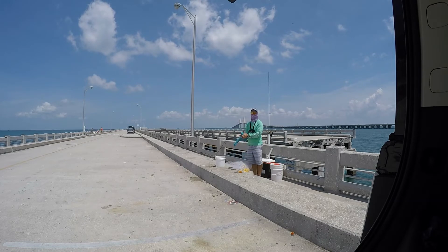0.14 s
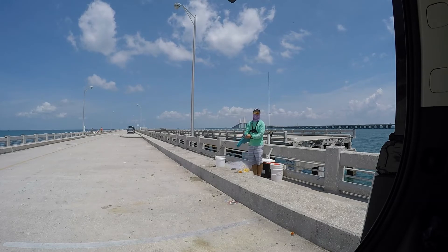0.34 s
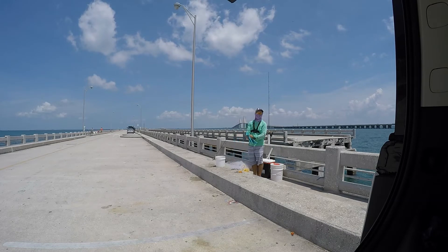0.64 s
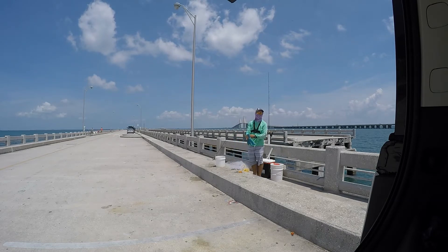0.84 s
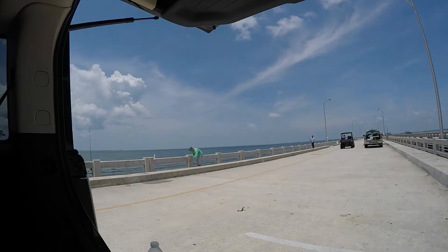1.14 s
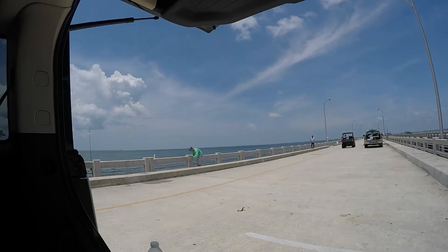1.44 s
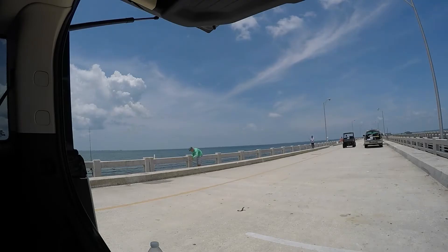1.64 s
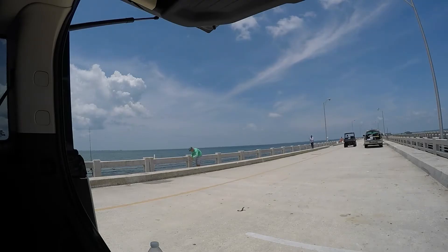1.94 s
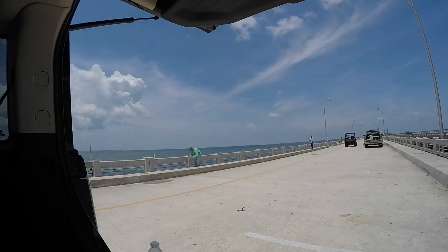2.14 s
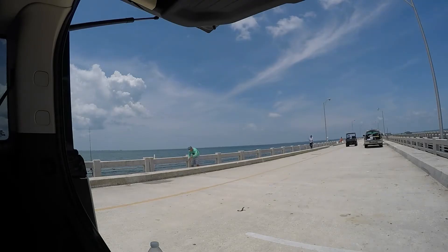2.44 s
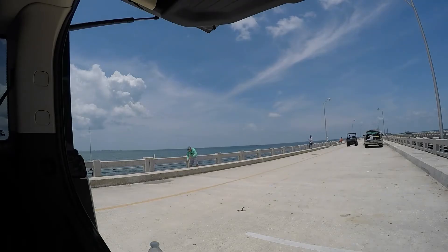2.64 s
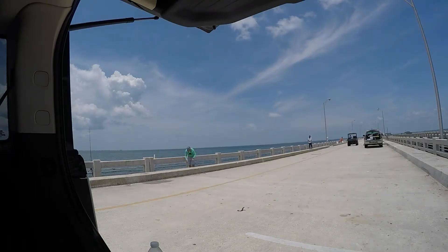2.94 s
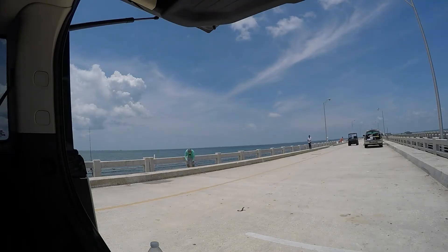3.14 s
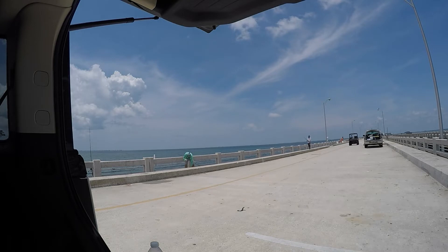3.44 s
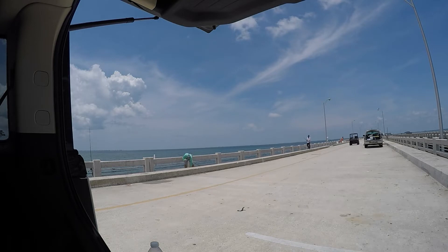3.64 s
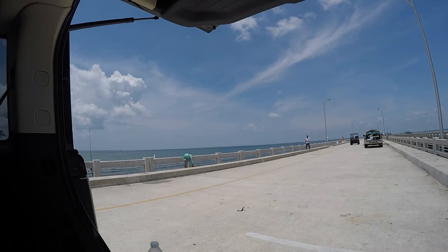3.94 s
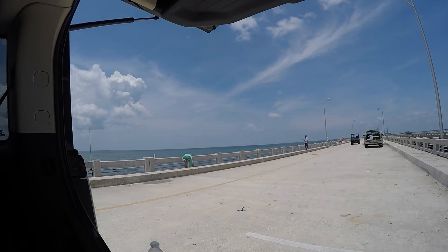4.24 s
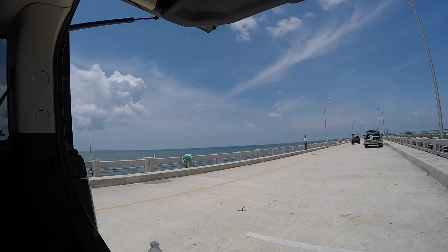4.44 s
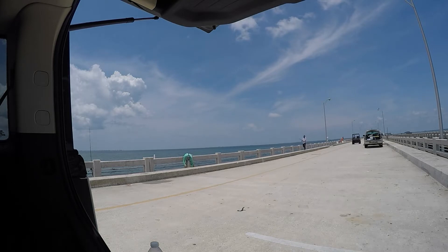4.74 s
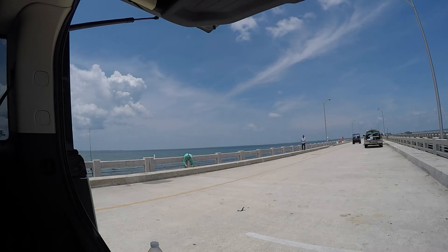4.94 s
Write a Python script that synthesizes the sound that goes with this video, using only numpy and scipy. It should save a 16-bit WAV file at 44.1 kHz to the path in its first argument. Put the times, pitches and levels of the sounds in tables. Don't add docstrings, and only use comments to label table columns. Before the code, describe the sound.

Low sea wind rumbles over faint surf hiss, then cuts to a vehicle engine idling close by with a steady droning throb.

```python
import sys
import numpy as np
from scipy import signal
from scipy.fft import rfft, irfft
from scipy.io import wavfile
from scipy.ndimage import uniform_filter1d

SR = 44100
rng = np.random.default_rng(int(sys.argv[2]) if len(sys.argv) > 2 else 0)


def digitize_waveform(pressure):
    field = np.atleast_2d(pressure).T
    bounded = np.clip(field, -1, 1)
    quanta = np.round(bounded * 32767).astype(np.int16)
    wavfile.write(sys.argv[1], SR, quanta)


def level_to_linear(level):
    exponent = np.asarray(level, float) / 20
    return 10 ** exponent


N = 224468
T = np.arange(N) / SR
HZ = np.maximum(np.fft.rfftfreq(N, 1 / SR), 1)

# (out from [s], out to [s], in from [s], in to [s])
FADE_TIMES = (1.095, 1.126, 1.1455, 1.18)
# (frequency [Hz], left minus right [dB])
PORT_BALANCE = [(60, -1.5), (400, -1.2), (800, 0.45), (1300, 0.2), (2300, -2), (4300, -3.5), (7900, -6.5),
                (14500, -2)]
# (frequency [Hz], share heard by both [0-1])
PORT_COHERENCE = [(50, 0.92), (300, .99), (700, 0.94), (1500, 0.74), (3000, 0.6), (6000, 0.29),
                  (14000, 0.18)]
PORT_LAG_S = 5.45 / 44100

# (frequency [Hz], density [dB per Hz])
PIER_SPECTRUM = [(8.8, -32), (15, -10.5), (57, -8.5), (135, -23.5), (214, -26), (255, -34), (303, -27),
                 (393, -32.5), (467, -32.5), (606, -32), (808, -31.5), (1280, -32), (1400, -33.5),
                 (2970, -44.5), (15000, -71)]
# (time [s], length [s], level [dB])
WIND_SWELLS = [
    (.15, 0.033, -2.5),
    (.33, 0.034, -1.5),
    (.42, .04, -0.5),
    (.57, 0.026, -3),
]
WIND_DB, SEA_DB, PREAMP_DB = -39.5, -54, -70

# (frequency [Hz], density [dB per Hz])
BOOM_SPECTRUM = [(15, -11), (47, 10.5), (74, -3.5), (108, 5.5), (140, -11), (200, -12), (400, -17),
                 (700, -57)]
# (time [s], length [s], level [dB])
PANEL_BURSTS = [
    (2.33, 0.11, 17.5),
    (2.7, 0.21, 13.5),
    (3.95, 0.14, 13),
    (4.28, 0.21, 16),
]
PANEL_HZ, PANEL_WIDTH_HZ, PANEL_DB = 572.4, 5.7, -63.5

# (frequency [Hz], density [dB per Hz])
GAS_SPECTRUM = [(300, -1.5), (450, -4.5), (600, -9.5), (780, -12), (1100, -10.5), (1700, -7), (2150, -6),
                (2450, -14), (3300, -14), (4000, -16.5), (8500, -21.5), (10500, -28), (13000, -32.5),
                (15000, -40)]
# (time [s], length [s], level [dB])
GAS_SURGES = [
    (2.22, .1, 1.5),
    (2.44, .08, -1.2),
    (2.62, 0.15, 1.2),
    (4.72, .2, 1.5),
]
# (frequency [Hz], width [Hz], level [dB])
BLOCK_MODES = [(565, 97, -4), (652, 53, -3), (1040, 440, -7.5), (1380, 35, 0.5), (1553, 390, -7.5),
               (1656, 55, -.5), (1733, 78, -8.5), (2040, 55, 0.5), (2764, 96, -13), (2980, 50, -11.5),
               (3243, 48, -7.5), (3485, 570, -18.5), (4403, 83, -13), (4755, 35, -12.5), (5240, 110, -15.5),
               (6900, 36, -17.5)]
# (time [s], length [s], level [dB])
BLOCK_RATTLES = [
    (1.7, 0.12, 1),
    (2.24, .15, -5),
    (3.97, .08, 2),
    (4.5, 0.17, -2),
    (5.0, 0.038, 1),
]
# (multiple of firing rate, level re clatter [dB], gain under load [dB])
GEAR_TEETH = [(50, -13, 2), (51, -17, 26), (54, -15, 5), (57, -15, 3), (68, -23, 6)]
WHINE_FLUTTER_DB, WHINE_WOBBLE_RAD = 2.8, 0.6

# (multiple of firing rate, level [dB])
LOADED_HARMONICS = [(1, -4), (2, -4), (3, -4), (4, -2), (5, 1), (6, -15.5), (7, -1), (8, -5.5), (9, -12.5),
                    (10, -23), (11, -12), (12, -7.5), (13, -19), (14, -41), (15, -58), (16, -25),
                    (17, -18.5), (18, -34), (19, -30.5), (20, -28)]
# (multiple of firing rate, level [dB])
LIGHT_HARMONICS = [(1, -0.5), (2, 1.5), (3, 2), (4, -6), (5, 0), (6, -12.5), (7, -21), (8, -16), (9, -47),
                   (10, -18), (11, -15), (12, -12), (13, -16), (14, -32), (15, -35), (16, -40), (17, -16),
                   (18, -49), (19, -19), (20, -17)]
# (time [s], firing rate [Hz])
FIRING_RATE = [(1.17, 30.648), (1.45, 30.744), (1.7, 30.73), (1.95, 30.771), (2.25, 31.102), (2.55, 31.268),
               (2.8, 31.637), (3.05, 31.09), (3.35, 30.788), (3.65, 30.473), (3.95, 30.302), (4.15, 30.292),
               (4.45, 30.397), (4.75, 30.484), (5.09, 30.342)]
# (time [s], load [0-1], effort re full [dB])
ENGINE_LOAD = [
    (1.17, 0.69, 0),
    (1.7, 0.76, 0),
    (2.3, 0.75, -0.7),
    (2.7, 0.55, -1.3),
    (3.05, 0.59, -3),
    (3.4, 0.46, -5),
    (3.65, 0.49, -5),
    (4.0, 0.12, -5.5),
    (5.09, 0.05, -6),
]
TWIST_RAD, EVEN_LOAD = 1.4, 0.6
EXHAUST_DB, CLATTER_DB, GAS_DB, BOOM_DB = -30.5, -42.5, -42, -43
CLATTER_SHARE, GAS_SHARE = 0.42, 0.69


def unit(x):
    return x / np.sqrt(np.mean(x ** 2))


def over_hz(table):
    hz, value = np.transpose(table)
    return np.interp(np.log(HZ), np.log(hz), value)


def curves(table):
    s, *columns = np.transpose(table)
    return [np.interp(T, s, column) for column in columns]


def walk(rate):
    hold = int(SR / rate)
    levels = np.repeat(rng.standard_normal(N // hold + 1), hold)
    slewed = uniform_filter1d(uniform_filter1d(levels, hold), hold)
    return 1.48 * slewed[:N]


def swells(table):
    return sum(db * np.exp(-((T - s) / length) ** 2) for s, length, db in table)


def ports(gain, envelope):
    shared, left, right = rfft(rng.standard_normal((3, N)) * envelope)
    coherence = np.clip(over_hz(PORT_COHERENCE), 0, 1)
    late = np.exp(-2j * np.pi * HZ * PORT_LAG_S)
    direct = np.sqrt(coherence) * shared * np.array([late, late ** 0])
    diffuse = np.sqrt(1 - coherence) * np.array([left, right])
    tilt = level_to_linear(over_hz(PORT_BALANCE) / 2)
    return irfft((direct + diffuse) * gain * np.array([tilt, 1 / tilt]), N)


def late_left(x):
    return np.array([level_to_linear(-0.3) * np.interp(T - PORT_LAG_S, T, x), x])


def flutter(table, envelope, flicker_db, rate):
    colour, out = level_to_linear(over_hz(table)), 0
    for centre_hz in 16 * 2. ** np.arange(11):
        band = np.cos(np.pi / 2 * np.clip(np.log2(HZ / centre_hz), -1, 1))
        out = out + ports(colour * band, envelope) * level_to_linear(flicker_db * walk(rate))
    return unit(out)


def pier():
    air = rfft(flutter(PIER_SPECTRUM, 1, flicker_db=0.55, rate=10.0))
    low = 1 / (1 + (HZ / 260) ** 4)
    wind = unit(irfft(air * low, N))
    sea = unit(irfft(air * (1 - low), N))
    return level_to_linear(WIND_DB + swells(WIND_SWELLS)) * wind + level_to_linear(SEA_DB) * sea


def preamp():
    return level_to_linear(PREAMP_DB) * rng.standard_normal((2, N))


def boom():
    return flutter(BOOM_SPECTRUM, 1, flicker_db=2.6, rate=3.654)


def panel():
    ring = 1 / (1 + (2 * (HZ - PANEL_HZ) / PANEL_WIDTH_HZ) ** 2)
    return unit(ports(ring, 1)) * level_to_linear(PANEL_DB + swells(PANEL_BURSTS))


def throb(turns, blow, depth, lead):
    decay = np.exp(-((turns + lead) % 1) / 0.38)
    return 1 + depth * uniform_filter1d(blow * decay, size=260)


def gas(turns, blow):
    return flutter(GAS_SPECTRUM, throb(turns, blow, 0.83, 0.16), flicker_db=-0.65, rate=5.3)


def clatter(turns, blow):
    power = sum(level_to_linear(2 * db) / (1 + (2 * (HZ - hz) / width) ** 2) ** 2 for hz, width, db in BLOCK_MODES)
    return unit(ports(np.sqrt(power), throb(turns, blow, 0.42, 0.037)))


def whine(turns, load):
    out = 0
    for multiple, db, gain_db in GEAR_TEETH:
        level = level_to_linear(db + gain_db * (load - 0.5) + WHINE_FLUTTER_DB * walk(9))
        out = out + level * np.sin(2 * np.pi * multiple * turns + WHINE_WOBBLE_RAD * walk(15))
    return late_left(out)


def exhaust(turns, load):
    order, loaded_db = np.transpose(LOADED_HARMONICS)
    light_db = np.array(LIGHT_HARMONICS)[:, 1]
    log_gain = np.interp(np.arange(65), order, np.log(level_to_linear(loaded_db)))
    causal = -0.85 * np.imag(signal.hilbert(np.r_[log_gain, log_gain[-2:0:-1]]))
    size = level_to_linear(0.48 * rng.standard_normal(400))[(turns + 0.1).astype(int)]
    wobble = 0.07 + 0.1 * (1 - load)
    twist = TWIST_RAD * (EVEN_LOAD - load)
    out = 0
    for k, high_db, low_db in zip(order, loaded_db, light_db):
        db = low_db + load * (high_db - low_db) + (0.5 + 0.06 * k) * walk(3.56)
        phase = causal[int(k)] + twist + wobble * (1 + k / 12) * walk(4.84)
        out = out - level_to_linear(db) * np.cos(2 * np.pi * k * turns + phase)
    return unit(late_left(out) * uniform_filter1d(size, size=200))


def engine():
    (firing_hz,), (load, effort_db) = curves(FIRING_RATE), curves(ENGINE_LOAD)
    turns = np.cumsum(firing_hz) / SR + 0.786
    load = np.clip(load, 0, 1)
    blow_db = 1.5 * rng.standard_normal(400) + 1.1 * (-1) ** np.arange(400)
    blow = level_to_linear(blow_db)[turns.astype(int)]
    clatter_db = CLATTER_DB + CLATTER_SHARE * effort_db + swells(BLOCK_RATTLES)
    gas_db = GAS_DB + GAS_SHARE * effort_db + swells(GAS_SURGES)
    drone = level_to_linear(EXHAUST_DB + effort_db) * exhaust(turns, load)
    mechanical = level_to_linear(clatter_db) * (clatter(turns, blow) + whine(turns, load))
    hiss = level_to_linear(gas_db) * gas(turns, blow)
    return drone + mechanical + hiss + level_to_linear(BOOM_DB) * boom()


def scene():
    out_from, out_to, in_from, in_to = FADE_TIMES
    residue = level_to_linear(-27)
    fade_out = np.interp(T, [out_from, out_to, in_from, in_to], [1, residue, residue, 0])
    fade_in = np.interp(T, [in_from, in_to], [0, 1]) ** 0.92
    return (pier() + preamp()) * fade_out + (engine() + panel()) * fade_in


def top_cut(x):
    return signal.sosfilt(signal.butter(12, 15110, fs=SR, output="sos"), x)


def record(dry):
    bass_cut = signal.butter(2, 14, "high", fs=SR, output="sos")
    treble_cut = signal.ellip(8, 0.2, 60, 15050, fs=SR, output="sos")
    mix = signal.sosfilt(treble_cut, signal.sosfilt(bass_cut, dry))
    return top_cut(mix)


dry = scene()
out = record(dry)
digitize_waveform(out)
```